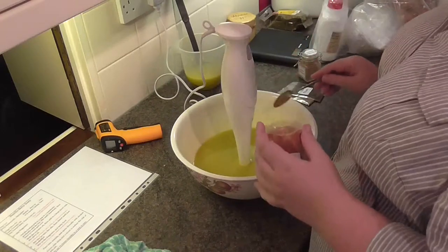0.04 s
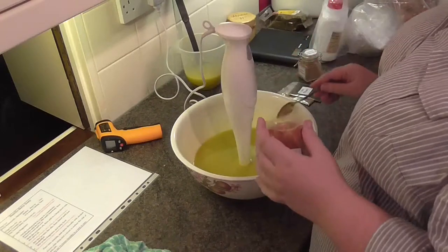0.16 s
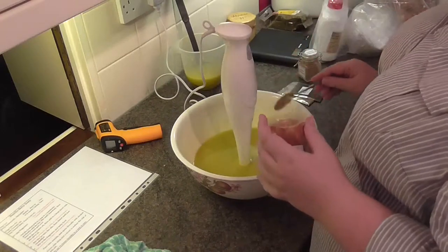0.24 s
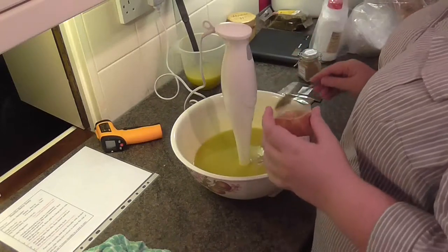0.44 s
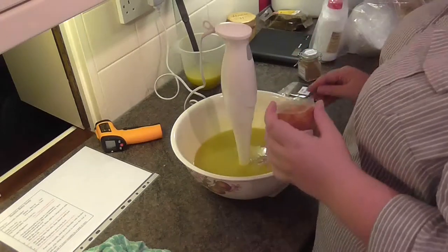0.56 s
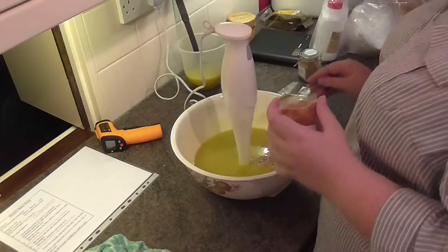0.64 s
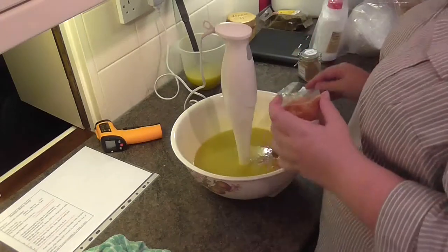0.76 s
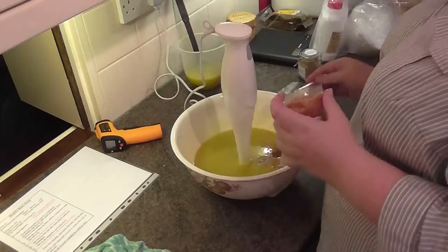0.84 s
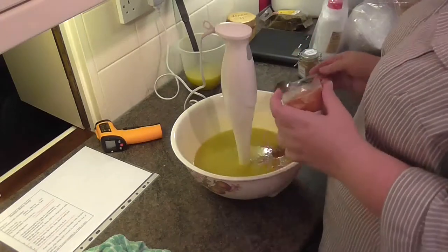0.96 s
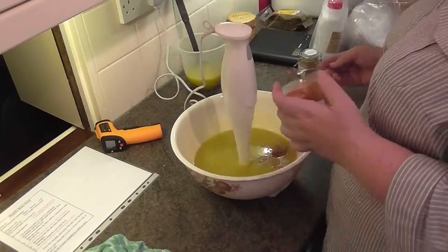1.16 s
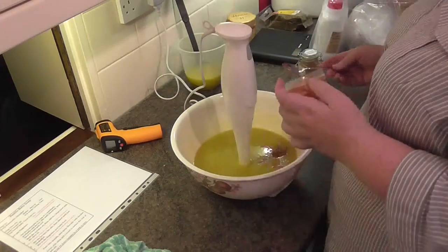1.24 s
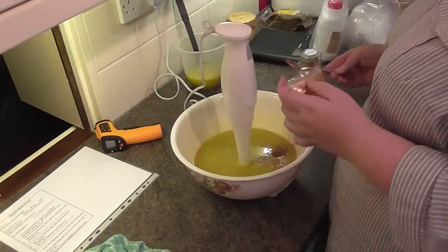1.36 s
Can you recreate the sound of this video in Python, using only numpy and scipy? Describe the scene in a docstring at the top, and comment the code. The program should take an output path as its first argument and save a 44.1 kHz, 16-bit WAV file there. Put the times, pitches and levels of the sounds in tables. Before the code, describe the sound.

A small metal spoon knocks four times on a glass jar, each knock ringing briefly.

```python
"""Spoon on a glass jar

A small metal spoon knocks four times on a glass jar held over a bowl in a small hard-walled kitchen.
Each knock is a crack with a thud, which the room answers while jar, spoon and bowl ring on. A short hiss
swells just before each knock and stops at it. Soft rumble and hiss lie below; gain control ducks peaks."""
import sys
import numpy as np
from scipy import signal
from scipy.io import wavfile

SR = 44100
rng = np.random.default_rng(int(sys.argv[2]) if len(sys.argv) > 2 else 0)


def wrap_up_sound(samples):
    """Save the sound to the file named by the first command line argument, as 16-bit audio."""
    columns = np.atleast_2d(samples).T
    # keep every value between -1 and 1, then stretch to whole-number steps
    tamed = np.clip(columns, -1, 1)
    steps = np.round(tamed * 32767).astype(np.int16)
    wavfile.write(sys.argv[1], SR, steps)


N = 61739
TIME_S = np.arange(N) / SR


def amp(db):
    """dB to gain."""
    return 10 ** (np.asarray(db) / 20)


def at_hz(table, hz, col=1):
    """Table lookup on a log-frequency axis."""
    points = np.array(table)
    return np.interp(np.log(hz), np.log(points[:, 0]), points[:, col])


def resonate(drive, hz, t60_s):
    """Two-pole resonator: a unit click starts a decaying sine of height 1."""
    r, w = amp(-60 / (t60_s * SR)), 2 * np.pi * hz / SR
    return signal.lfilter([0, np.sin(w)], [1, -2 * r * np.cos(w), r * r], drive + 1e-18)


def noise_bands(gain_at, coherence_at):
    """Stereo noise in half-octave bands; gain and L/R coherence are functions of frequency."""
    edges_hz = 30 * 2 ** np.arange(0, 9.6, .5)
    white = rng.standard_normal((2, 2, N))
    noise = 0
    for k, (low, high) in enumerate(zip(edges_hz, edges_hz[1:])):
        bandpass = signal.butter(2, [low, high], "band", fs=SR, output="sos")
        mid, side = signal.sosfilt(bandpass, white[k % 2])
        hz = np.sqrt(low * high)
        coherence = coherence_at(hz)
        stereo = np.sqrt(1 + coherence) * mid + np.sqrt(1 - coherence) * side * [[1], [-1]]
        noise += gain_at(hz) * stereo
    return noise


def coloured_noise(spectrum, coherence):
    """Steady stereo noise, rms 1."""
    noise = noise_bands(lambda hz: amp(at_hz(spectrum, hz)), lambda hz: coherence)
    return noise / noise.std()


# Background spectra: f/Hz, relative density/dB
RUMBLE_SPECTRUM = [(25, -45), (60, -23), (120, -8), (205, -0.5), (300, -3), (500, -8), (800, -8.5),
                   (1300, -17), (2500, -26), (4000, -61)]
AIR_SPECTRUM = [(1500, -31.5), (2500, -10), (6000, -5.5), (11000, -10), (16000, -10.5)]
# Background envelope: t/s, rumble level/dB, hiss level/dB
BACKGROUND_LEVELS = [(0, -50, -65), (.14, -52, -64), (1.101, -58.5, -69.5), (1.221, -61.5, -72.5),
                     (1.338, -59.5, -70), (1.4, -50.5, -63.5)]


def background():
    """Room rumble and faint hiss; both sink slowly and come back at the end."""
    times_s, rumble_db, hiss_db = np.transpose(BACKGROUND_LEVELS)
    rumble = amp(np.interp(TIME_S, times_s, rumble_db)) * coloured_noise(RUMBLE_SPECTRUM, coherence=0.52)
    hiss = amp(np.interp(TIME_S, times_s, hiss_db)) * coloured_noise(AIR_SPECTRUM, coherence=0.61)
    return rumble + hiss


# Swell peak at each knock: level/dB
SWELL_PEAKS_DB = [-35.5, -37, -36, -36]
# Swell spectrum: f/Hz, relative density/dB
SWELL_SPECTRUM = [(120, -33), (300, -16.5), (1000, -6.5), (2500, -7), (6000, -7), (10000, -7), (16000, -11)]
SWELL_RISE_DB_PER_S, SWELL_LEAD_S = 250.5, 0.067


def hiss_swell():
    """A short hiss swells just before each knock and stops at it."""
    envelope = np.zeros(N)
    for (onset_s, *_), peak_db in zip(BLOWS, SWELL_PEAKS_DB):
        ahead_s = onset_s - TIME_S
        rising = (ahead_s > 0) & (ahead_s < SWELL_LEAD_S)
        envelope[rising] += amp(peak_db - SWELL_RISE_DB_PER_S * ahead_s[rising])
    return envelope * coloured_noise(SWELL_SPECTRUM, coherence=0.95)


# Broad crack resonances, thud to tick: f/Hz, t60/s
CRACK_MODES = [(200, 0.023), (310, 0.02), (450, 0.023), (590, 0.011), (780, 0.017), (1100, 0.0067),
               (1500, 0.0022), (2100, 0.0045), (3200, 0.0045), (4200, 0.0014), (5050, 0.0032),
               (5950, 0.0019), (7400, .003), (8900, 0.0014), (11000, .002), (13800, 0.00067)]


def crack(onset_s, contact_s, levels_db):
    """Two touches at random moments of the brief contact drive each resonance, passed twice."""
    track = np.zeros(N)
    start, contact_samples = int(onset_s * SR), int(contact_s * SR)
    for (hz, t60_s), db in zip(CRACK_MODES, levels_db):
        polarity = rng.choice([-1, 1])
        moments = (contact_samples * rng.random(2) ** 2).astype(int)
        touches = np.zeros(SR // 10)
        touches[moments] = polarity * np.array([1, 0.3])
        burst = resonate(resonate(touches, hz, t60_s), hz, t60_s)
        track[start:start + len(burst)] += amp(db) * burst / np.abs(burst).max()
    return track


# Modes of jar, spoon and bowl: f/Hz
MODES_HZ = [151, 183, 405, 499, 610, 657, 769, 838, 1225, 1756, 2339, 3036, 3130, 3193, 3746, 5705, 8368]
# Response per mode: rim-struck level/dB, side-struck level/dB, t60/s, swell/s
MODE_RESPONSES = [(-17.5, -4.5, 0.36, 0.03), (-1, -3, 0.15, 0.0067), (-20.5, -13.5, 0.58, 0.016),
                  (-41, -22, 0.67, 0.014), (-28.5, -10.5, .35, 0.0067), (-35, -2, 0.19, 0.03),
                  (-1.5, -10, 0.43, .04), (-2, -29, 0.19, 0.013), (-27, -37, 1, 0.033),
                  (2, -27, 0.19, 0.0039), (-2.5, -9.5, 0.27, 0.0014), (-5.5, -11.5, .22, 0.004),
                  (-17.5, -15.5, 0.42, 0.0012), (-9, -45, 0.34, .003), (-8.5, -33.5, .2, .003),
                  (-5, -11, 0.22, 0.0011), (-26.5, -32, 0.54, .003)]
RING_SPREAD_DB, RING_PAN_DB, RING_LEAD_RAD = 1.2, 1.5, 0.13


def ringing(onset_s, spot, level_db, pans):
    """Modes swell and fade, weighted by the spot struck; each reaches L and R a little unevenly."""
    track = np.zeros((2, N))
    age_s = np.maximum(TIME_S - onset_s, 0)
    for hz, pan, (rim_db, side_db, t60_s, swell_s) in zip(MODES_HZ, pans, MODE_RESPONSES):
        db = level_db + rim_db + spot * (side_db - rim_db) + RING_SPREAD_DB * rng.standard_normal()
        envelope = amp(db - 60 * age_s / t60_s) * (1 - np.exp(-age_s / swell_s))
        tone = np.sin(2 * np.pi * hz * age_s + pan * RING_LEAD_RAD)
        track += envelope * tone * amp(pan * RING_PAN_DB)
    return track


# Spoon blows: t/s, contact/s, spot (0 rim, 1 side), ring level/dB, then level/dB per crack mode
BLOWS = [(0.223, 0.0023, 0.017, -15, -24.5, -31.5, -32.5, -22.5, -23.5, -12, -10, -14.5, -16, -4, -4, -3.5, -14.5, -11, -15, -8.5),
         (.4280, .0015, 0.13, -16.5, -31.5, -37, -34, -30, -31.5, -17, -9, -22, -12.5, -3.5, -9.5, -3.5, -56, -13.5, -24.5, -13.5),
         (0.6436, 0.0013, 0.81, -16, -25, -30.5, -27, -23, -29, -29.5, -26, -34, -15, -3.5, -15.5, -2.5, -19.5, -10.5, -23, -13),
         (0.8497, .001, 1, -19, -26, -33, -28, -29, -27, -28, -24, -22, -18.5, -11, -14, -4, -25.5, -12, -25, -17.5)]
DAMPING_DB, DAMPING_S = -11, 0.01


def knocks():
    """Each blow cracks, starts the modes and damps the ringing of the blow before."""
    cracks, rings = np.zeros(N), np.zeros((2, N))
    pans = rng.uniform(-1, 1, (len(MODES_HZ), 1, 1)) * [[1], [-1]]
    next_onsets_s = [blow[0] for blow in BLOWS[1:]] + [np.inf]
    for (onset_s, contact_s, spot, ring_db, *crack_db), next_s in zip(BLOWS, next_onsets_s):
        cracks += crack(onset_s, contact_s, crack_db)
        damping = amp(DAMPING_DB * np.clip((TIME_S - next_s) / DAMPING_S, 0, 1))
        rings += damping * ringing(onset_s, spot, ring_db, pans)
    return cracks, rings


# Echoes off hand, bowl, worktop and wall: delay/s, level/dB, L-R/dB
EARLY_ECHOES = [(.0021, -12.5, 5.5), (.0043, -4.5, 1.5), (.0078, -27, -9), (0.0121, -26.5, -18.5)]
# Reverb tail: f/Hz, level/dB, t60/s
TAIL_BANDS = [(155, -24.5, 0.27), (280.3, -22, 0.39), (604, -25, 0.41), (1111, -27, 0.41),
              (2350, -21.5, 0.35), (4960, -37.5, 0.37), (8300, -30, 0.36), (11600, -31.5, 0.19),
              (14920, -22.5, 0.092)]
# Tail stereo image: f/Hz, L/R coherence
TAIL_COHERENCE = [(60, .7), (180, 1), (550, 0.79), (1650, 0.75), (5000, 0.49), (10000, .5), (12000, 1),
                  (16000, 1)]
TAIL_BUILD_S, ECHO_CUTOFF_HZ = 0.0017, 17000


def kitchen(source):
    """Hard surfaces return a few echoes, then a dense tail that builds and dies band by band."""
    echoes = np.zeros((2, N))
    for delay_s, db, pan_db in EARLY_ECHOES:
        echoes[:, int(delay_s * SR)] = amp([db + pan_db / 2, db - pan_db / 2])
    echoes = signal.sosfilt(signal.butter(2, ECHO_CUTOFF_HZ, fs=SR, output="sos"), echoes)
    tail = noise_bands(lambda hz: amp(at_hz(TAIL_BANDS, hz) - 60 * TIME_S / at_hz(TAIL_BANDS, hz, 2)),
                       lambda hz: at_hz(TAIL_COHERENCE, hz))
    tail *= 1 - np.exp(-TIME_S / TAIL_BUILD_S)
    return signal.fftconvolve(echoes + tail, source[None], axes=1)[:, :N]


def scene():
    """Cracks with their reverb, ringing, background and hiss swells."""
    cracks, rings = knocks()
    low_cut = signal.butter(3, 84, "high", fs=SR, output="sos")  # the knocks carry no deep bass
    return signal.sosfilt(low_cut, cracks + rings + kitchen(cracks)) + background() + hiss_swell()


THRESHOLD_DB, DUCK_DB_PER_DB, ATTACK_S, RELEASE_DB_PER_S = -32, 0.29, 0.009, 161.5
CEILING, STOPBAND_HZ = 0.79, 17160


def record(dry):
    """Gain control ducks after each peak and releases at a steady rate; soft clip, then low-pass."""
    peak_db = 20 * np.log10(np.abs(dry).max(axis=0) + 1e-9)
    release_db = RELEASE_DB_PER_S * TIME_S
    held_db = np.maximum.accumulate(peak_db + release_db) - release_db
    excess_db = np.maximum(held_db - THRESHOLD_DB, 0)
    pole = np.exp(-1 / (ATTACK_S * SR))
    duck_db = signal.lfilter([1 - pole], [1, -pole], DUCK_DB_PER_DB * excess_db)
    rounded = CEILING * np.tanh(dry * amp(-duck_db) / CEILING)
    return signal.sosfilt(signal.cheby2(12, 70, STOPBAND_HZ, fs=SR, output="sos"), rounded)


dry = scene()
out = record(dry)
wrap_up_sound(out)
```